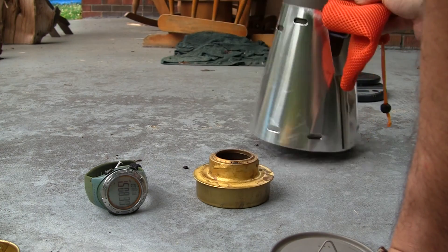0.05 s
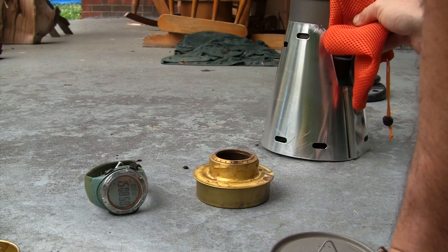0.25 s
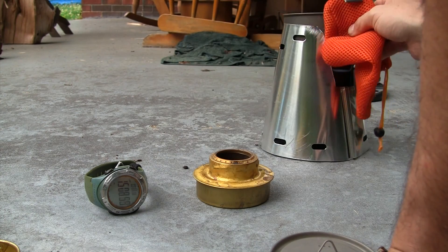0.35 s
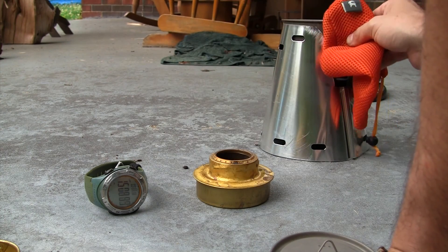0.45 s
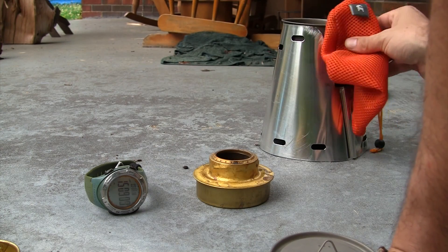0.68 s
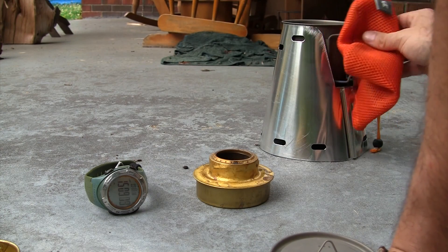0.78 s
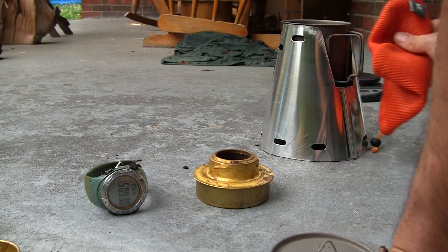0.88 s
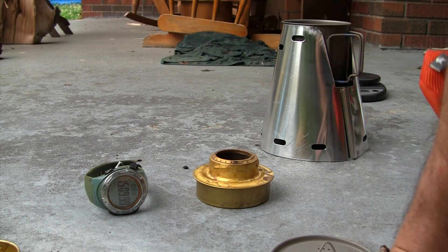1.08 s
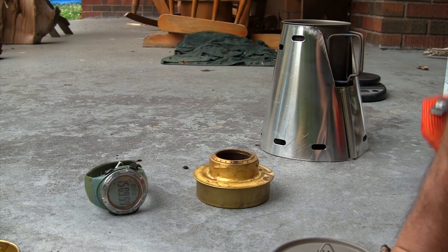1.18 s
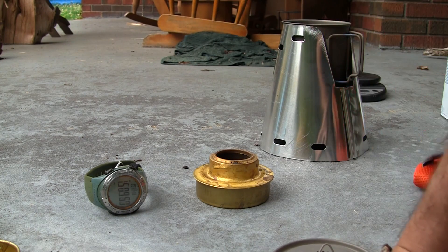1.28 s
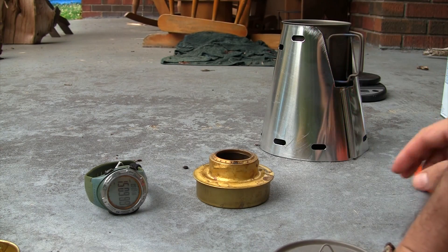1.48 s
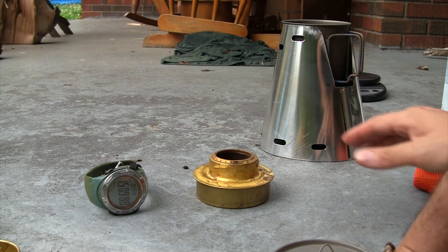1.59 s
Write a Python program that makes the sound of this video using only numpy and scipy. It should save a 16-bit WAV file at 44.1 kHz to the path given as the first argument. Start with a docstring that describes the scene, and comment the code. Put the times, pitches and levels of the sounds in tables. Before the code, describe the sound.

Close up on a quiet outdoor porch, a hollow metal cone bangs onto the concrete, drags with rattling knocks, pauses, clunks once more as it settles, then leaves tiny metallic ticks and dull soft bumps.

```python
"""A concrete porch in quiet outdoor air: a thin steel cone with a pot in it is set down close to the microphone.
Its rim strikes and rings, drags over the grit, judders, drops flat and rocks once more as the hand lets go.
Knocks are damped modes with a splash of noise; the drag is random grains, coloured and ringing the cone.
Short bursts of noise make slab thuds, tiny ticks, faint pings and soft bumps.
The porch adds short reflections, and the first strike overloads the recorder."""
import sys
import numpy as np
from scipy import signal
from scipy.fft import rfft, irfft
from scipy.io import wavfile

SR = 44100
rng = np.random.default_rng(int(sys.argv[2]) if len(sys.argv) > 2 else 0)


def transcribe(signal):
    """Save signal, clipped to [-1, 1], as a 16-bit WAV file at the path in sys.argv[1]."""
    frames = np.atleast_2d(signal).T
    limited = np.clip(frames, -1, 1)
    pcm = np.round(limited * 32767).astype(np.int16)
    wavfile.write(sys.argv[1], SR, pcm)


N = 72765
TIME = np.arange(N) / SR  # seconds

# All t60 values are the time to fall by 60 dB.

# Outdoor air: (frequency [Hz], level [dB per Hz])
AIR_COLOUR = [(15, -46), (25, -25.5), (233, -1), (432, -3), (508, -5), (665, -5.5), (995, -8.5),
              (1270, -10), (1370, -10.5), (1800, -12), (3720, -17.5), (11500, -32.5), (15400, -43.5)]
# How alike left and right are in the air: (frequency [Hz], likeness [-1 to 1])
AIR_STEREO = [(60, 0.49), (200, 0.77), (450, 0.73), (850, 0.27), (1700, 0), (4000, 0)]
AIR_DB = -46

# Reflections of the porch: (frequency [Hz], level [dB per Hz])
REFLECTION_COLOUR = [(100, -2.5), (500, 3.5), (2000, -6.5), (6000, 2), (15000, -13.5)]
PORCH_T60_S, PORCH_DB, PORCH_DELAY_S = 0.21, -16, 0.011

# How alike left and right are in all other noise: (frequency [Hz], likeness [-1 to 1])
NEAR_STEREO = [(60, 1), (200, 0.93), (1000, 0.97), (2000, 0.91), (4000, 0.18), (8000, 0.42), (15000, 0.22)]

# The cone's weight thuds on the slab: (time [s], level [dB])
SLAB_THUDS = [(0.2048, -18), (.221, -27), (0.446, -42), (0.479, -39)]
# Tone of the slab: (frequency [Hz], level [dB per Hz])
THUD_COLOUR = [(20, 15), (40, 4), (100, 1), (230, 9), (500, -28), (2000, -63)]
THUD_T60_S = 0.028

# Tiny ticks of the hot metal and its wire handle: (time [s], level [dB], centre [Hz])
METAL_TICKS = [(.733, -47, 7000), (0.765, -43, 6960), (1.0915, -48, 7700), (1.1045, -40, 7400),
               (1.134, -51, 9300), (1.1852, -43.5, 9800), (1.2148, -49, 8200), (1.2653, -50, 7900),
               (1.501, -59, 12000)]
TICK_T60_S, TICK_OCTAVES = 0.011, 0.12  # octaves per 6 dB of fall

# Faint narrow pings of the wire handle: (time [s], level [dB], centre [Hz])
HANDLE_PINGS = [(1.105, -51, 2620), (1.135, -50, 2620), (1.42, -43, 1000)]
PING_T60_S, PING_OCTAVES = 0.061, 0.064  # octaves per 6 dB of fall

# Soft bumps as the arm moves away: (time [s], level [dB])
ARM_BUMPS = [(1.502, -39.5), (1.533, -39.5), (1.552, -44), (1.618, -38.5)]
# Tone of the bumps: (frequency [Hz], level [dB per Hz])
SOFT_BUMP_COLOUR = [(60, -25), (150, -7.5), (280, 11.5), (550, -4), (1200, -5), (3000, -30), (9000, -38)]
BUMP_T60_S = 0.06

# Gritty treble of the dragged rim: (time [s], level [dB])
GRIT_LEVEL = [(.12, -71), (.15, -45), (.2, -51), (.21, -32), (.3, -37.5), (.368, -29), (.42, -29.5),
              (.49, -37), (.55, -35), (.561, -24), (.574, -34), (.587, -23.5), (.625, -53.5), (.70, -64.5),
              (.74, -56), (.80, -49), (.818, -44.5), (.852, -48), (.88, -72)]
# Tone of the grit: (frequency [Hz], level [dB per Hz])
GRIT_TONE = [(300, -37), (1500, -12), (2600, -16), (3500, 0), (4800, -5), (6700, 1), (8500, -6.5),
             (11000, -8), (15000, -21.5)]
# Rasp in the cone as the rim drags: (time [s], level [dB])
RASP_LEVEL = [(.115, -91), (.13, -40), (.2, -39), (.23, -28.5), (.32, -29.5), (.40, -26), (.46, -16.5),
              (.492, -27), (.55, -26.5), (.59, -18), (.635, -34.5), (.70, -53), (.76, -40), (.805, -35),
              (.85, -34.5), (.92, -84)]
# Tone of the rasp: (frequency [Hz], level [dB per Hz])
RASP_TONE = [(70, -40), (150, -26), (220, -17.5), (320, -11.5), (430, -5.5), (560, -5), (680, 2.5),
             (790, -1), (1000, -4.5), (1450, -8), (1630, -2), (1850, -12), (2300, -10.5), (2600, -11),
             (3200, -14.5), (4500, -37.5)]
GRAINS_PER_S = 5000
# The cone's ring under the drag, against the rasp; extra damping by the ground
RUB_DB, RUB_T60_S = -8.5, 0.6

# The rim meets the concrete: (time [s], level [dB], brightness [Hz], free ringing [dB])
RIM_KNOCKS = [(0.2055, 9.5, 3600, -4), (0.2144, -6, 3000, -10), (0.22, -34, 4030, -15),
              (.238, -14, 2500, 0.5), (.252, -12, 1800, -22), (.412, -12.5, 1800, 1), (.421, -8, 2460, 2.5),
              (0.43, -23, 2500, -20.5), (.4373, -7, 1570, -25), (.447, -11, 2160, 7),
              (0.4492, -5, 1800, -29), (.459, -10, 2500, -15), (0.4629, -9, 2200, -8),
              (.469, -12.5, 2200, -14), (.479, -14, 2200, -18), (.500, -6, 3940, -2), (.5045, -9, 2230, 2),
              (0.5123, -11, 2200, -11), (.526, -24.5, 2200, -14), (0.557, -14.5, 9000, 7.5),
              (0.5719, -21, 4000, -7), (.578, -3, 4070, -1.5), (.5855, -9, 6100, -14),
              (0.5919, -16.5, 3040, -28), (.600, -11, 2030, 0), (.8088, -10.5, 1790, 0),
              (0.8142, -4.5, 2190, -15), (0.8194, -9.5, 3000, 0), (.8245, -14.5, 1990, -26),
              (.832, -13.5, 1490, -36), (.8425, -13.5, 1590, -10), (.851, -45, 2000, -18)]
# The cone's ringing: (frequency [Hz], level while tilted [dB], level once seated [dB], t60 while tilted [s])
CONE_RING = [(211, -20, -13, 0.29), (402, -6.5, -27, 0.48), (439, -11.5, -22, 0.57),
             (534.4, -24, -30, 0.78), (625, -24, -18, 0.48), (654.5, -9.5, -18, 0.54), (707, -12.5, -16, 1),
             (757, -12.5, -9, 0.43), (800, -1, 0.5, 0.32), (896, -11, -12, .3), (1095, -7, -22, 0.28),
             (1517, -38, -1, .25), (1686, -15.5, -16, .4), (1807, -17.5, -31, 0.74), (1915, -18, -25, 0.29),
             (2133, -31, -12, 0.39), (2440, -42, 2, 0.1), (2772, -22, -29, 0.77)]
RING_DB, STRIKE_SCATTER_DB = -19, 2.5  # the scatter serves ring and clack

# Broad resonances of cone and pot that die at once: (frequency before detuning [Hz], level [dB], t60 [s])
CLACK_MODES = [(406, -9.5, 0.023), (761, 1.5, 0.026), (923, -8.5, 0.051), (1180, -6, 0.023),
               (1709, -3, 0.042), (2090, -20, 0.013), (2540, -17, 0.075), (3040, -18, 0.021),
               (5850, -21, 0.015)]
CLACK_DB = -4.5
CLACK_DETUNE_OCTAVES = 0.13  # once seated, the clack shifts with the point of contact

# The crowd of close sheet-metal modes: (frequency [Hz], level [dB per Hz])
SHEET_COLOUR = [(100, -6), (220, -14), (320, -5), (500, 0.5), (820, 5.5), (1100, -5.5), (1350, -1),
                (1600, -15.5), (1850, -8), (2100, -1), (2350, -15), (2560, -8.5), (2800, -8), (3200, -8.5),
                (4000, -16), (6200, -14), (15000, -31)]
# Decay of the sheet metal while tilted: (frequency [Hz], t60 [s])
SHEET_DECAY = [(100, 0.084), (500, 0.07), (2000, 0.079), (6000, 0.06), (15000, 0.075)]
SHEET_DB = -8

# Once the whole rim touches, ring and splash keep only a share of their t60
SEATED_S, SEATED_RING_SHARE, SEATED_SPLASH_SHARE = 0.4, 0.74, 0.91
LOW_CUT_HZ = 195.4  # the thin wall radiates no bass
LEFT_LAG_S, LEFT_DB = 0.00004, 0.28  # the left channel against the right

LIMIT_DB, LIMIT_ATTACK_S, LIMIT_RELEASE_DB_PER_S = -0.5, 0.0043, 298
CEILING, CUTOFF_HZ = 0.99, 15500


def from_db(db):
    """Turn decibels into gain."""
    return 10 ** (np.asarray(db) / 20)


def rms_one(x):
    """Scale to unit rms."""
    return x / np.sqrt(np.mean(x ** 2) + 1e-20)


def at_hz(points, hz):
    """Read a table on a log-frequency axis."""
    table_hz, values = np.transpose(points)
    return np.interp(np.log(np.maximum(hz, 1)), np.log(table_hz), values)


def level(rows):
    """Draw a gain envelope through (time, dB) rows; practically silent outside them."""
    return from_db(np.interp(TIME, *np.transpose(rows), left=-120, right=-120))


def decay(t60, size):
    """Fall exponentially from 1, by 60 dB in each t60."""
    return from_db(-60 * TIME[:size] / t60)


def add(out, s, sound):
    """Mix a sound in from time s."""
    start = int(s * SR)
    out[:, start:start + sound.shape[-1]] += sound[..., :N - start]


def coloured(colour, pair, likeness=NEAR_STEREO):
    """Shape two signals into mid and side of one stereo sound of this colour and width; rms 1."""
    size = pair.shape[-1]
    hz = np.arange(size // 2 + 1) * SR / size
    mid, side = rfft(pair) * from_db(at_hz(colour, hz))
    alike = np.clip(at_hz(likeness, hz), -0.998, 0.998)
    spectrum = np.sqrt(1 + alike) * mid + np.sqrt(1 - alike) * side * [[1], [-1]]
    return rms_one(irfft(spectrum, size))


def noise(colour, size, likeness=NEAR_STEREO):
    """Make steady stereo noise of a given colour."""
    return coloured(colour, rng.standard_normal((size, 2)).T, likeness)


def burst(colour, t60, size=8000):
    """Coloured noise that starts at once and dies away."""
    return noise(colour, size) * decay(t60, size)


def peak_at(hz, octaves):
    """A colour that falls 6 dB for every so many octaves from its centre."""
    return [(hz * 2 ** (k * octaves), -abs(k) * 6) for k in (-8, 0, 8)]


def modes(table, scatter_db, size):
    """Damped sines of alternating sign, each struck with a strength of its own if scattered."""
    out = np.zeros(size)
    for k, (hz, db, t60) in enumerate(table):
        strength = (-1) ** k * from_db(db + scatter_db * rng.normal())
        out += strength * np.sin(2 * np.pi * hz * TIME[:size]) * decay(t60, size)
    return out


def air():
    """Quiet outdoor air is steady coloured noise."""
    return from_db(AIR_DB) * noise(AIR_COLOUR, N, AIR_STEREO)


def porch(x, size=22000):
    """Short diffuse reflections from the brick wall and the roof, as a decaying noise tail."""
    tail = noise(REFLECTION_COLOUR, size) * decay(PORCH_T60_S, size)
    tail = tail * (TIME[:size] > PORCH_DELAY_S)
    response = rms_one(tail) / np.sqrt(size)
    return from_db(PORCH_DB) * signal.fftconvolve(x, response, axes=1)[:, :N]


def small_sounds():
    """Thuds of the slab, tiny ticks and pings of the metal, and dull bumps are short noise bursts."""
    out = np.zeros((2, N))
    for s, db in SLAB_THUDS:
        add(out, s, from_db(db) * burst(THUD_COLOUR, THUD_T60_S))
    for s, db, hz in METAL_TICKS:
        add(out, s, from_db(db) * burst(peak_at(hz, TICK_OCTAVES), TICK_T60_S))
    for s, db, hz in HANDLE_PINGS:
        add(out, s, from_db(db) * burst(peak_at(hz, PING_OCTAVES), PING_T60_S))
    for s, db in ARM_BUMPS:
        add(out, s, from_db(db) * burst(SOFT_BUMP_COLOUR, BUMP_T60_S))
    return out


def cone_modes(s):
    """The ground favours other modes, and damps them, once the cone is seated."""
    if s > SEATED_S:
        return [(hz, seated_db, t60 * SEATED_RING_SHARE) for hz, _, seated_db, t60 in CONE_RING]
    return [(hz, tilted_db, t60) for hz, tilted_db, _, t60 in CONE_RING]


def grains():
    """Sand grains catch under the rim at random, each with a random strength on either channel."""
    caught = rng.random(N) < GRAINS_PER_S / SR
    return caught * rng.standard_normal((2, N))


def scrape(size=22000):
    """The dragged rim hisses on the grit, makes the cone rasp and keeps its modes ringing."""
    ring = modes(cone_modes(0), 0, size) * decay(RUB_T60_S, size)
    ring = rms_one(ring) / np.sqrt(size)
    drive = level(RASP_LEVEL) * rms_one(grains()[0])
    rubbed = signal.fftconvolve(drive, ring)[:N]
    hiss = level(GRIT_LEVEL) * coloured(GRIT_TONE, grains())
    rasp = level(RASP_LEVEL) * coloured(RASP_TONE, grains())
    return hiss + rasp + from_db(RUB_DB) * rubbed


def clack(s, size):
    """Broad, quickly damped resonances of cone and pot."""
    octaves = CLACK_DETUNE_OCTAVES * (s > SEATED_S)
    table = [(hz * 2 ** (octaves * rng.uniform(-1, 1)), db, t60) for hz, db, t60 in CLACK_MODES]
    return modes(table, STRIKE_SCATTER_DB, size)


def sheet(share, size):
    """Modes too close to tell apart: noise split into octaves, each with its own decay."""
    rest, out = noise(SHEET_COLOUR, size), 0
    for top_hz in 250 * 2 ** np.arange(7):
        low_pass = signal.butter(2, top_hz, fs=SR, output="sos")
        band = signal.sosfiltfilt(low_pass, rest)
        rest = rest - band
        t60 = share * at_hz(SHEET_DECAY, top_hz / np.sqrt(2))  # read at mid-octave
        out = out + band * decay(t60, size)
    return out


def knocks(size=26000):
    """Each contact gives a clack, a splash of sheet metal and a ring, through its own treble roll-off."""
    out = np.zeros((2, N))
    for s, db, bright_hz, ring_db in RIM_KNOCKS:
        splash_share = SEATED_SPLASH_SHARE if s > SEATED_S else 1
        blow = from_db(CLACK_DB) * clack(s, size)
        blow = blow + from_db(SHEET_DB) * sheet(splash_share, size)
        blow = blow + from_db(RING_DB + ring_db) * modes(cone_modes(s), STRIKE_SCATTER_DB, size)
        soft = np.exp(-2 * np.pi * bright_hz / SR)  # one-pole low-pass
        add(out, s, from_db(db) * signal.lfilter([1 - soft], [1, -soft], blow))
    low_cut = signal.butter(4, LOW_CUT_HZ, "high", fs=SR, output="sos")
    return signal.sosfilt(low_cut, out)


def scene():
    """The cone stands a little to the right, so the left side hears it later; air and porch surround it."""
    left, right = knocks() + scrape()
    late_left = from_db(LEFT_DB) * np.interp(TIME - LEFT_LAG_S, TIME, left)
    near = np.array([late_left, right]) + small_sounds()
    return near + porch(near) + air()


def record(dry):
    """A limiter ducks after loud peaks, what slips past it is flattened, and the top is cut."""
    peak_db = 20 * np.log10(np.abs(dry).max(axis=0) + 1e-9)
    over = np.maximum(peak_db - LIMIT_DB, 0)
    recovery = LIMIT_RELEASE_DB_PER_S * TIME
    held = np.maximum.accumulate(over + recovery) - recovery  # peaks recover at a steady dB rate
    lag = np.exp(-1 / (LIMIT_ATTACK_S * SR))
    ducked = dry * from_db(-signal.lfilter([1 - lag], [1, -lag], held))
    clipped = ducked / (1 + np.abs(ducked / CEILING) ** 10) ** (1 / 10)
    top_cut = signal.ellip(10, 0.05, 70, CUTOFF_HZ, fs=SR, output="sos")
    return signal.sosfilt(top_cut, clipped)


dry = scene()
out = record(dry)
transcribe(out)
```